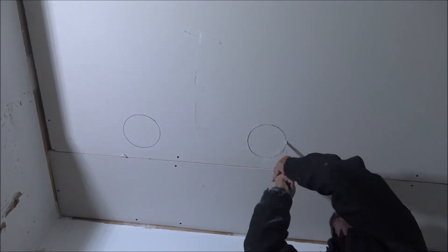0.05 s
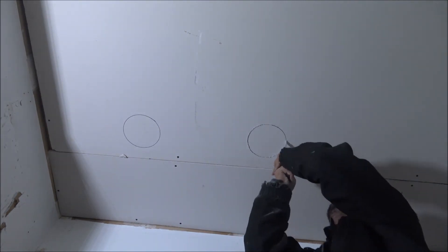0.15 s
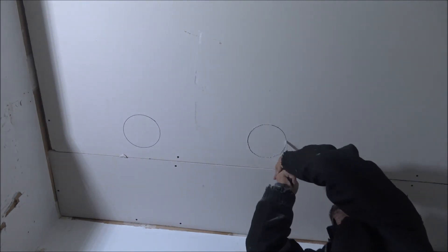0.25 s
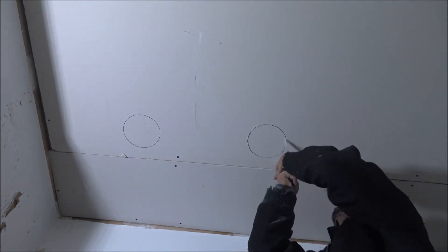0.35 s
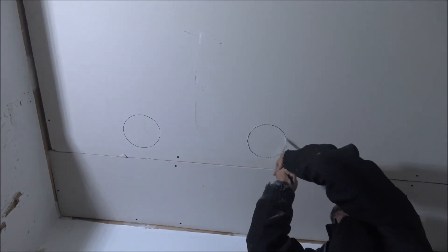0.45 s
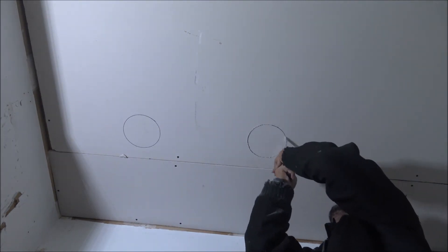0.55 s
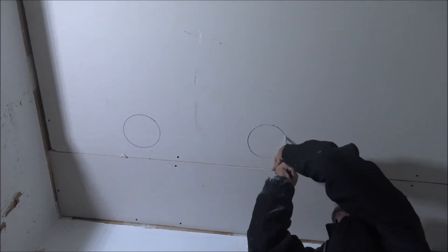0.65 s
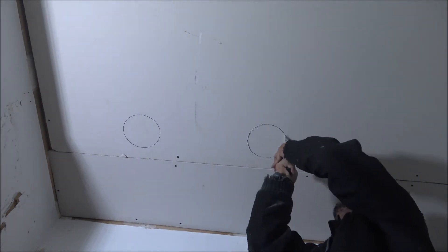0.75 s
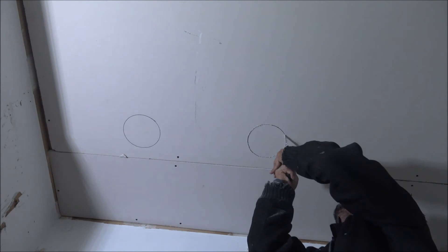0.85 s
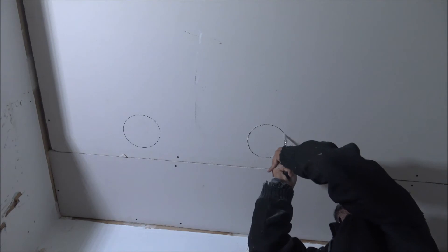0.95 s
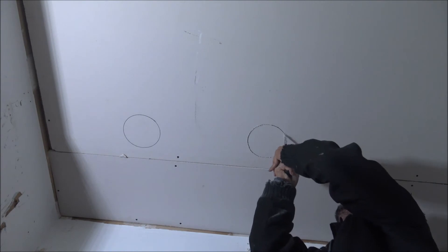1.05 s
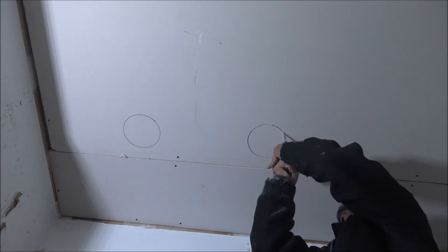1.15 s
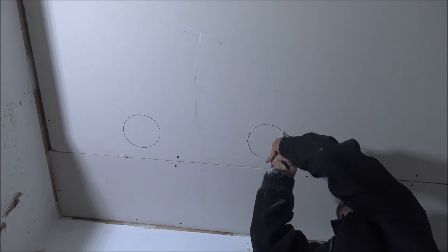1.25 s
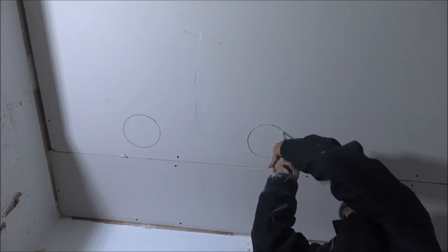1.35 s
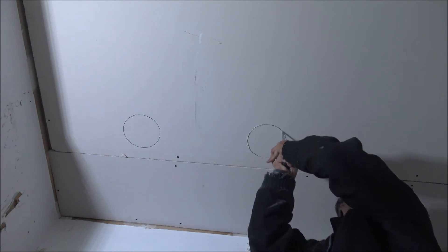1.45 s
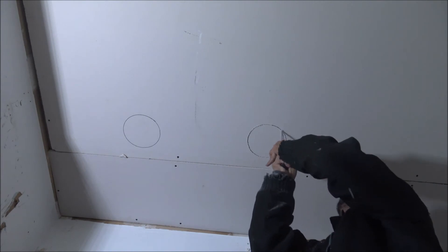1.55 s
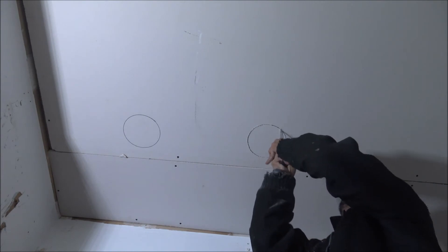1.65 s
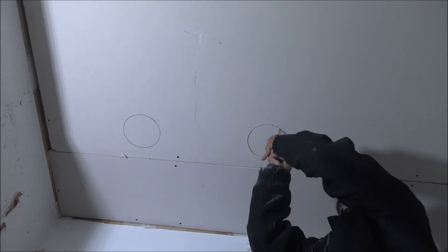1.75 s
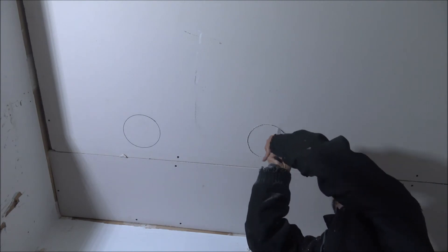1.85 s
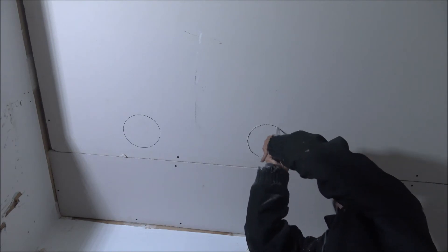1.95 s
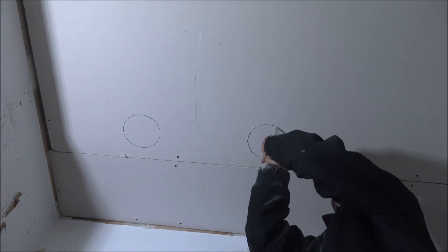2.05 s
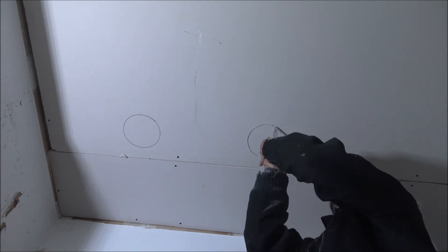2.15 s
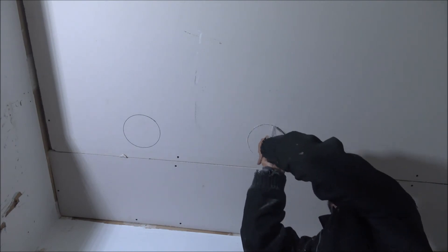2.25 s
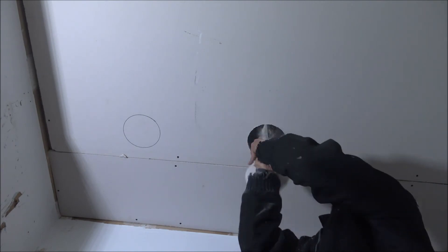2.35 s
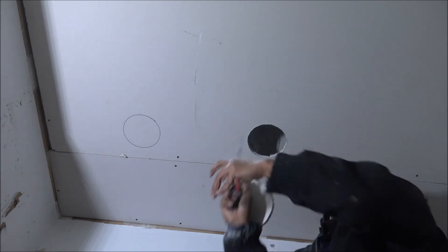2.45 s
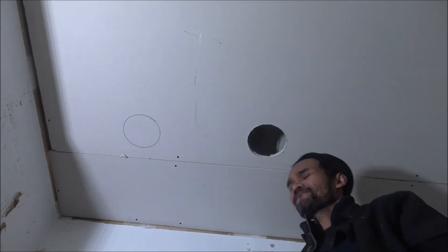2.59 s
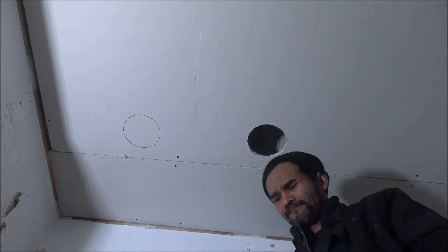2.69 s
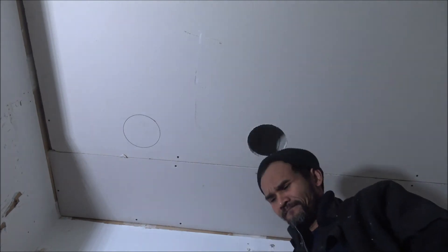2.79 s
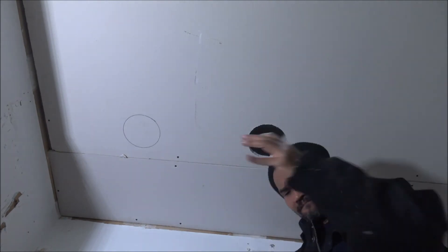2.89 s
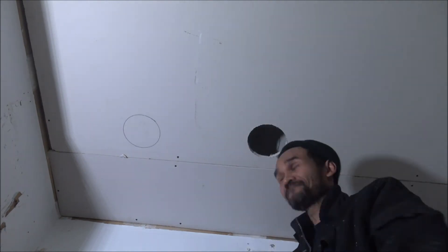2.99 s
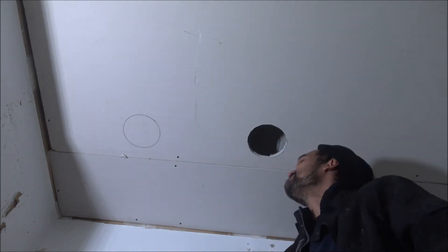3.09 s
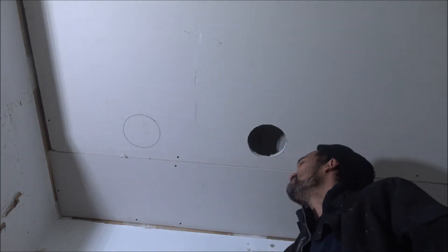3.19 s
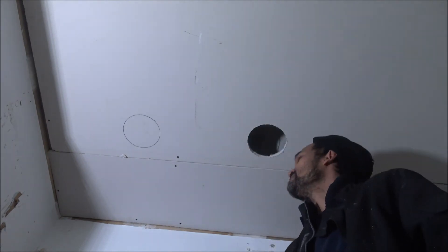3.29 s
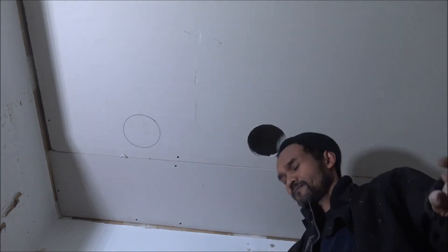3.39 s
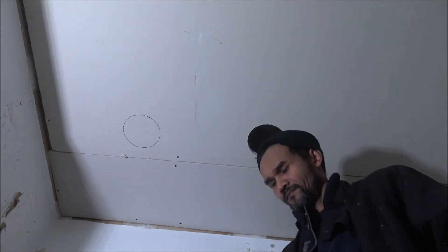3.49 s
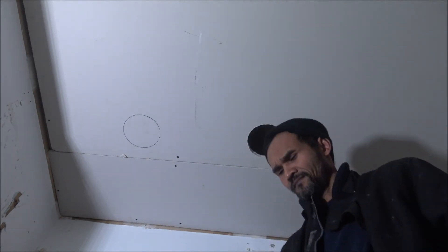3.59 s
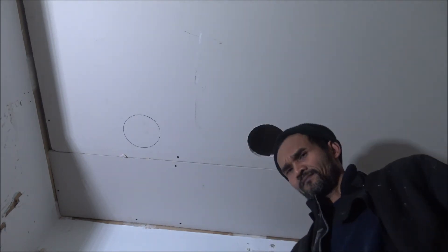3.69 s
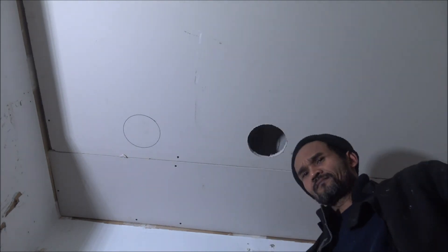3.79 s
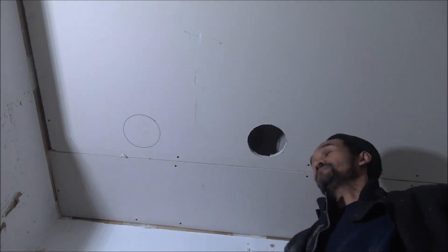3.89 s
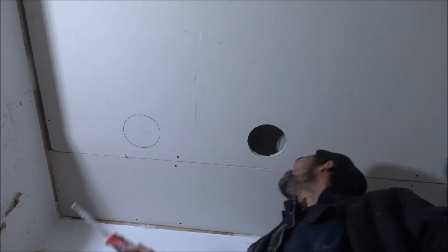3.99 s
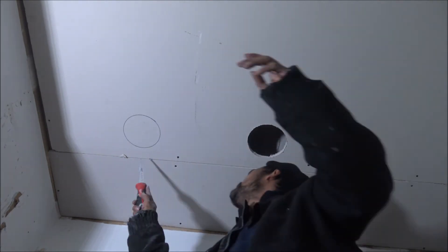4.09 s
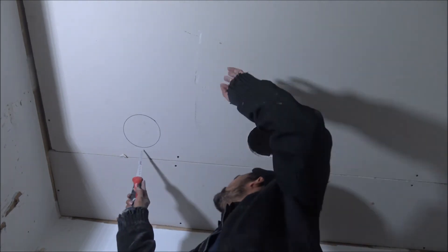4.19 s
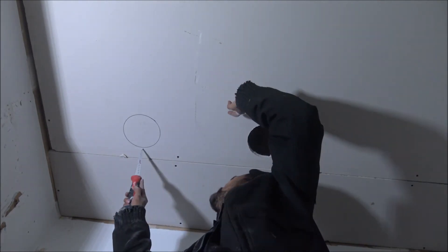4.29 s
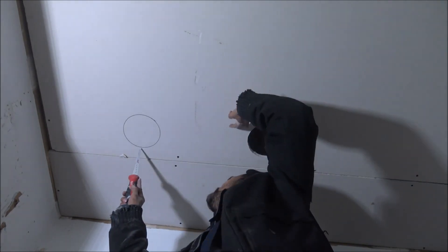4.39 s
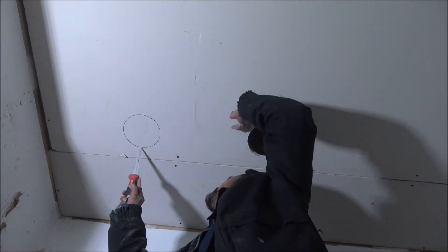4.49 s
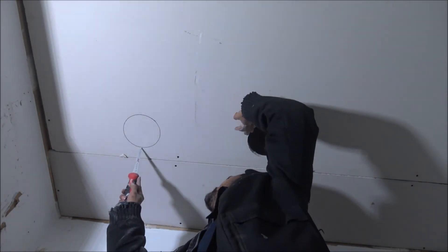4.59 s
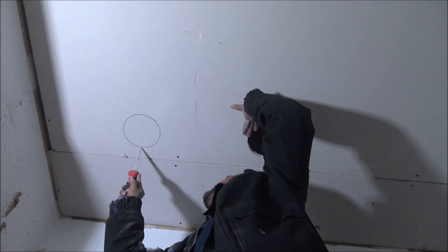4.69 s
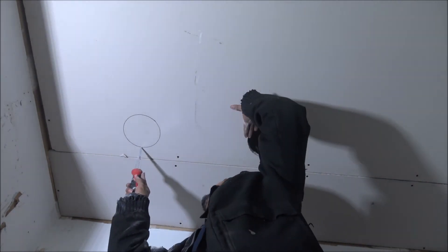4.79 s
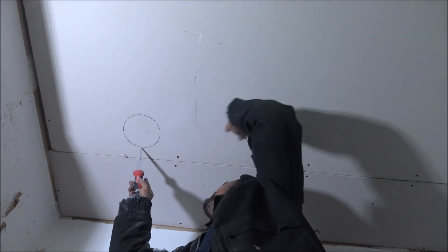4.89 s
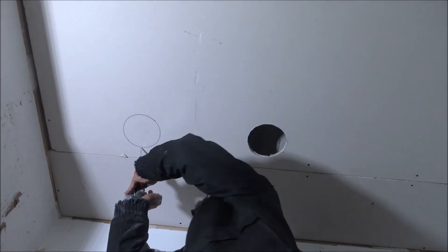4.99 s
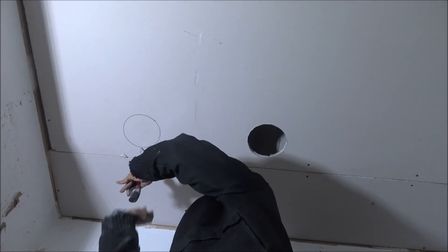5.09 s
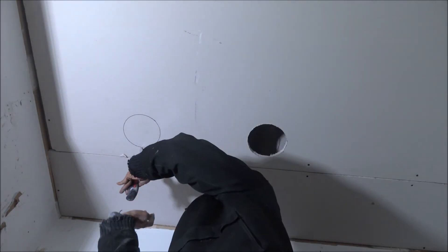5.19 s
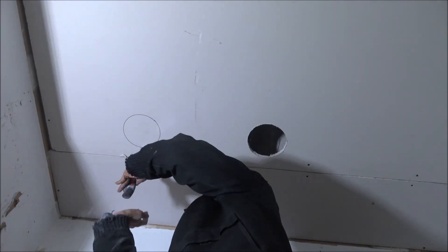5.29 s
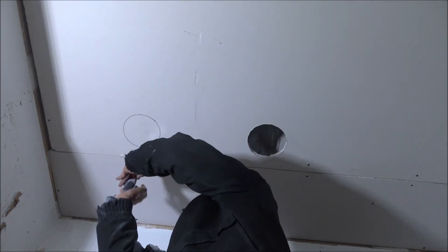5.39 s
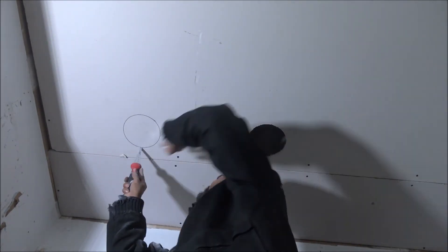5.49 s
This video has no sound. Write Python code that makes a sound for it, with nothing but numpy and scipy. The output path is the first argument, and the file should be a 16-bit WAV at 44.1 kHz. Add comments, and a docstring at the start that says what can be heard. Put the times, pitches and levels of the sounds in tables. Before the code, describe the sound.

Fast back-and-forth sawing makes a hollow sheet buzz and hiss with gypsum dust, pausing twice. The sound stops; metal knocks and scrapes a little left of centre, clothing and hands bump and brush, and small hollow tocks lead to three violent punching crunches. Close microphone, dry small unfinished room, quiet steady air and low electric hum, peaks slightly squashed.

```python
"""Jab saw in a plasterboard ceiling

Very quick strokes cut a round hole: tooth impacts excite the resonant sheet and tear out hissing gypsum.
Steel clatters as the saw comes away, a jacket rustles, the tip pecks and squeaks, then a palm drives the
blade into the next hole with three jabs. Contact forces and fracture noise excite resonant filters.
The room is small and bare, with a faint hum; the image is nearly mono and a limiter rounds off the peaks."""
import sys
import numpy as np
from scipy import signal
from scipy.fft import rfft, irfft, next_fast_len
from scipy.io import wavfile
from scipy.ndimage import uniform_filter1d, minimum_filter1d, map_coordinates

SR = 44100
rng = np.random.default_rng(int(sys.argv[2]) if len(sys.argv) > 2 else 0)


def unload_audio(sound):
    """Save the sound as a 16-bit wav file, at the path given as the first command line argument."""
    columns = np.transpose(np.atleast_2d(sound))
    # keep every value between -1 and 1, then stretch to whole-number steps
    steps = np.round(np.clip(columns, -1, 1) * 32767)
    wavfile.write(sys.argv[1], SR, steps.astype(np.int16))


N = 244314  # length in samples

# Spectrum of a light tap, also of rubbed cloth. Each row: frequency in Hz, relative level in dB.
TAP_SPECTRUM = [(30, -27), (100, -24), (300, -2), (600, 0.5), (900, -2), (1400, -9.5), (2200, -9),
                (4300, -10), (6000, -31.5), (10000, -61)]
# Spectrum of bright surface friction. Each row: frequency in Hz, relative level in dB.
BRUSH_SPECTRUM = [(800, -18.5), (2400, -2), (4000, -1), (6500, -2.5), (11000, -4.5), (16000, -6.5)]
# Spectrum of the room air. Each row: frequency in Hz, relative level in dB.
AIR_SPECTRUM = [(20, -59.5), (40, -38), (62, -25), (82, -20), (105, -15), (160, -13.5), (270, -20.5),
                (470, -13), (650, -20.5), (2500, -27), (3100, -26.5), (4500, -28), (6500, -33),
                (16000, -34)]


def amp(db):
    """Amplitude ratio: 20 dB is a factor of ten."""
    return 10 ** (np.asarray(db) / 20)


def unit(x):
    """Normalization by the root mean square, to rms 1."""
    return x / np.sqrt(np.mean(x ** 2) + 1e-20)


def along(points, hz):
    """Logarithmic frequency scale: (Hz, value) points interpolated at hz."""
    point_hz, values = np.transpose(points)
    return np.interp(np.log(hz + 1), np.log(point_hz + 1), values)


def wobble(rate):
    """Band-limited randomness: a smooth curve through random knots, rate of them a second."""
    knots = rng.standard_normal(int(N * rate / SR) + 4)
    return map_coordinates(knots, [np.arange(N) * rate / SR])


def body(x, spectrum, modes=(), size=16384):
    """Resonance: x drives a minimum-phase filter of unit energy, a broad spectrum plus modal peaks."""
    hz = np.fft.rfftfreq(size, 1 / SR)
    db = along(spectrum, hz)
    for centre, width, rise_db in modes:
        db = db + rise_db / (1 + (2 * (hz - centre) / width) ** 2)
    # folding the cepstrum on to positive times makes the response causal
    cepstrum = irfft(np.log(amp(db)))
    cepstrum[1:size // 2] *= 2
    cepstrum[size // 2 + 1:] = 0
    ring = irfft(np.exp(rfft(cepstrum)))
    return signal.fftconvolve(x, ring / np.linalg.norm(ring))[:N]


def contact(times, lengths, levels_db, rise, t60, sag_db):
    """Contact force: it builds up over rise (s), sags over its length, then decays 60 dB per t60 (s)."""
    force = np.zeros(N)
    for s, length, db in np.broadcast(times, lengths, levels_db):
        start = int(s * SR)
        t = np.arange(min(N - start, SR // 2)) / SR
        held_db = sag_db * (.5 - np.minimum(t / length, 1))
        released_db = -60 * np.maximum(t - length, 0) / t60
        onset = 1 - np.exp(-(t / rise) ** 2)
        force[start:start + len(t)] += amp(db + held_db + released_db) * onset
    return force


def swell(times, lengths, levels_db, early, overrun):
    """Velocity-driven friction: each movement is an arch that peaks a little early and overruns (s)."""
    speed = np.zeros(N + SR)
    for s, length, db in zip(times, lengths, levels_db):
        phase = np.linspace(0, 1, int((length + overrun) * SR))
        arch = np.abs(np.sin(np.pi * phase ** early)) ** 0.78
        speed[int(s * SR):][:len(arch)] += amp(db) * unit(arch)
    return speed[:N]


def crumbs(rate, spread_db, smooth):
    """Fracture noise: random cracks of uneven size, rate a second, over a share of smooth friction."""
    occurs = rng.random(N) < rate / SR
    signs = rng.choice([-1, 1], N)
    cracks = occurs * signs * amp(spread_db * rng.standard_normal(N))
    return unit(unit(cracks) + smooth * rng.standard_normal(N))


def background():
    """Stationary noise and a tone: steady room air and a slightly unsteady electric hum."""
    hum_hz = 101
    phase = 2 * np.pi * hum_hz * np.arange(N) / SR + .25 * wobble(5.5)
    hum = np.sqrt(2) * np.sin(phase)
    air = body(rng.standard_normal(N), AIR_SPECTRUM)
    return amp(-55) * air + amp(-58.5 + 1.9 * wobble(4.02)) * hum


def jacket():
    """Sliding friction: cloth rubs and swishes with arm speed, unevenly as the folds give way."""
    # Arm movements. Each row: start in seconds, length in seconds, level in dB.
    movements = [(0.027, 0.17, -54), (2.395, 0.28, -55), (2.725, 0.33, -57.5), (3.64, 0.18, -52.5),
                 (3.863, 0.37, -51.5), (4.22, 0.4, -64.5), (4.598, 0.5, -54), (5.418, 0.057, -59.5)]
    swish_db = -1.5  # relative to the cloth
    rub = swell(*np.transpose(movements), early=0.84, overrun=0.061) * amp(0.65 * wobble(25))
    cloth = body(rub * crumbs(1500, 3.3, 0.44), TAP_SPECTRUM)
    swish = body(rub * crumbs(900, 9.7, .8), BRUSH_SPECTRUM)
    return cloth + amp(swish_db) * swish


def handling():
    """Soft impact: yielding hands and sleeves bump and brush in the low, middle and high bands."""
    # Bumps. Each row: start in seconds, thud level in dB, tap level in dB, brush level in dB.
    bumps = [(0.103, -59, -53, -45.5), (3.667, -34, -42.5, -42), (3.69, -32, -36.5, -33),
             (3.711, -43, -27, -31), (3.766, -32, -47, -40), (3.865, -31.5, -28, -38.5),
             (3.957, -36, -22, -36), (4.047, -27, -42, -30), (4.056, -23, -29, -24.5),
             (4.094, -36, -52, -32), (4.472, -51, -49, -56), (4.945, -46.5, -40.5, -49),
             (5.037, -44, -44, -52), (5.5, -30.5, -52, -43)]
    # Spectrum of the thud. Each row: frequency in Hz, relative level in dB.
    thud_spectrum = [(25, -38), (70, -20), (120, -2), (165, 7), (200, -12), (260, -23), (400, -15.5),
                     (1200, -40)]
    bump_s = 0.0096
    s, thud_db, tap_db, brush_db = np.transpose(bumps)
    thud = contact(s, bump_s, thud_db, rise=0.0036, t60=0.041, sag_db=1) * crumbs(1500, 0.68, 0.88)
    tap = contact(s, bump_s, tap_db, rise=0.0027, t60=0.051, sag_db=4.5) * crumbs(2500, 3.3, 0.21)
    brush = contact(s, bump_s, brush_db, rise=0.0029, t60=0.047, sag_db=5.5) * crumbs(3400, 1.3, 0.95)
    return body(thud, thud_spectrum) + body(tap, TAP_SPECTRUM) + body(brush, BRUSH_SPECTRUM)


def strokes():
    """Reciprocating motion: runs start with slow, weaker strokes and settle; single strokes join them."""
    # Hesitant strokes before, between and after the runs. Each row: start in seconds, length in seconds,
    # nominal tooth rate in Hz, force in dB, dust in dB.
    single_strokes = [(0.141, 0.012, 993.6, -32.5, -34), (0.164, 0.03, 999.4, -19, -27.5),
                      (0.67, 0.02, 570, -40, -50), (0.701, 0.046, 717, -17.5, -24.5),
                      (0.773, 0.045, 382.3, -15.5, -26.5), (1.342, 0.039, 419.5, -16.5, -25.5),
                      (1.389, 0.032, 472.3, -20.5, -30), (1.442, 0.026, 400.8, -28, -33.5),
                      (2.309, 0.041, 579.1, -15, -23.5), (2.355, 0.068, 597.6, -18.5, -21)]
    # Runs of quick sawing. Each row: start in seconds, end in seconds, settled stroke time in seconds,
    # time lost getting up to speed in seconds, mean tooth rate in Hz, initial force in dB, initial dust in dB.
    runs = [(0.251, 0.672, 0.048, 0.049, 391.1, -12, -19), (0.851, 1.331, 0.042, 0.06, 539.8, -11.5, -20.5),
            (1.494, 2.312, 0.044, 0.025, 561.2, -13, -23)]
    settle_strokes = 2.0  # the arm finds its pace over about this many strokes
    cutting_share = 0.83  # of a stroke's time; in the rest the blade turns round
    slow_loss_db = 12.5  # per unit of speed that a stroke falls short
    stroke_scatter_db, tooth_scatter = 0.5, 0.07  # no two strokes are alike
    # during a run the arm eases off and the kerf clogs
    tire_db_per_s, dust_fade_db_per_s = 6, 9.5
    rows = list(single_strokes)
    for start, end, period, lost, tooth_hz, force_db, dust_db in runs:
        k = np.arange(round((end - start - lost) / period) + 1)
        turns = start + k * period + lost * (1 - np.exp(-k / settle_strokes))
        for s, gap in zip(turns, np.diff(turns)):
            uneven, detune = rng.standard_normal(2)
            effort_db = stroke_scatter_db * uneven - slow_loss_db * (1 - period / gap)
            rows.append((s, cutting_share * gap, tooth_hz * (1 + tooth_scatter * detune),
                         force_db + effort_db - tire_db_per_s * (s - start),
                         dust_db + effort_db - dust_fade_db_per_s * (s - start)))
    return sorted(rows)


def teeth(rate_hz, jitter, scatter_db):
    """Periodic excitation: uneven kicks of the teeth and a rocking of the blade once a tooth, each at rms 1."""
    travel = np.cumsum(rate_hz * np.exp(jitter * wobble(400))) / SR  # in teeth
    catches = np.diff(np.floor(travel), prepend=0)
    kicks = catches * amp(scatter_db * rng.standard_normal(N)) / np.sqrt(rate_hz)
    rocking = np.cos(2 * np.pi * travel) * amp(7.5 * wobble(150))
    return unit(kicks), unit(rocking)


def cut(kicks, rocking, chatter, rasp, dust, boom, dust_spectrum, freed):
    """Forced vibration and fracture: teeth shake the sheet; each catch sets off a spray of gypsum cracks."""
    # Resonances of the ceiling sheet. Each row: centre in Hz, width in Hz, rise in dB.
    sheet_modes = [(215.5, 34, 8), (287, 57, 9.5), (391.5, 42, 10.5), (430, 47, -1), (573, 65, 7),
                   (724.4, 27, 9), (984, 43, 5.5), (1073, 46, 2.5), (1472, 58, 5.5), (1648, 20, 5.5),
                   (1950, 120, 5.5), (2310, 180, 4)]
    # Spectra of chatter in the firm sheet, chatter near a loose disc, gritty rasp and low sheet boom.
    # Each row: frequency in Hz, relative level in dB.
    firm_spectrum = [(30, -39.5), (90, -13), (170, -7), (260, -3), (340, -4.5), (560, -3.5), (800, -7),
                     (1200, -8), (2400, -29), (6000, -51.5)]
    loose_spectrum = [(30, -26), (90, -26.5), (170, -15), (260, -5), (340, -8), (470, 0), (570, -0.5),
                      (800, -1.5), (1200, -12), (2400, -31.5), (6000, -48.5)]
    rasp_spectrum = [(200, -18.5), (550, -4), (850, 2.5), (1400, -2), (1900, -4.5), (2300, -11.5),
                     (2700, -15), (3400, -19.5), (5000, -21.5), (10000, -50)]
    boom_spectrum = [(20, -28), (60, -39.5), (85, -17.5), (110, -16), (130, 1.5), (142, -4.5), (165, -13.5),
                     (260, -22), (600, -88.5)]
    # each catch decays with a time constant of 0.8 ms, over a steady share
    spray = signal.lfilter([1], [1, -np.exp(-1 / (.0008 * SR))], kicks)
    spray = unit(unit(spray) + .25)
    centred_kicks = kicks - uniform_filter1d(kicks, size=300)
    shake = chatter * (.78 * centred_kicks + rocking + .4 * crumbs(1200, 3, .3))
    # a disc that is nearly cut free passes less of the low chatter on to the ceiling
    firm = body(shake * (1 - freed), firm_spectrum, sheet_modes)
    loose = body(shake * freed, loose_spectrum, sheet_modes)
    grit = body(rasp * spray * crumbs(3000, 2.8, 0.57), rasp_spectrum, sheet_modes)
    powder = body(dust * spray * rng.standard_normal(N), dust_spectrum)
    flexing = body(boom * crumbs(900, 3.4, 0.45), boom_spectrum)
    return firm + loose + grit + powder + flexing


def sawing():
    """Speed-dependent excitation: in each stroke tooth rate and hiss follow the blade's speed up and down."""
    # The blade binds in the kerf and flexes the whole sheet. Each row: start in seconds, level in dB.
    binds = [(0.18, -21.5), (0.385, -29.5), (0.57, -30), (0.715, -23), (0.882, -43), (1.065, -23),
             (1.345, -33.5), (1.435, -29), (1.54, -24), (1.65, -24), (2.0, -29), (2.17, -41)]
    # How far the disc being cut has come loose. Each row: time in seconds, share from 0 to 1.
    loosening = [(1.0, 0.01), (1.45, 0.32), (1.95, 1)]
    # Spectrum of the gypsum dust. Each row: frequency in Hz, relative level in dB.
    powder_spectrum = [(800, -43.5), (2500, 4.5), (3500, -5.5), (4700, 0.5), (6200, -7), (8200, -5.5),
                       (10800, -1), (12600, -4.5), (14500, 0.5), (16000, -2.5)]
    rasp_db, boom_db = -1.46, -19  # relative to the force
    bind_length_s = 0.026
    clock = np.arange(N) / SR
    s, length, tooth_hz, force_db, dust_db = np.transpose(strokes())
    moments = s[:, None] + length[:, None] * np.linspace(0, 1, 4)
    speed = tooth_hz[:, None] * [.65, .93, 1.04, .98]
    rate_hz = np.interp(clock, np.sort(moments.ravel()), speed.ravel())
    kicks, rocking = teeth(rate_hz, jitter=.18, scatter_db=4)
    freed = np.clip(np.interp(clock, *np.transpose(loosening)), 0, 1)
    bind_s, bind_db = np.transpose(binds)
    flex = contact(s, length, force_db + boom_db, rise=0.0023, t60=0.14, sag_db=-4)
    flex += contact(bind_s, bind_length_s, bind_db, rise=0.004, t60=0.24, sag_db=2.5)
    chatter = swell(s, length, force_db, early=0.74, overrun=0.004)
    rasp = swell(s, length, force_db + rasp_db, early=0.9, overrun=0.0073)
    dust = swell(s, length, dust_db, early=0.71, overrun=0.0019)
    return cut(kicks, 0.033 * rocking, chatter, rasp, dust, flex, powder_spectrum, freed)


def clatter():
    """Hard impact on a thin plate: steel knocks, scrapes and skids, its blade rings, a bright tick on top."""
    # Contacts and skids. Each row: start in seconds, length in seconds, knock level in dB,
    # scrape level in dB, blade ring level in dB.
    strikes = [(2.554, 0.011, -31, -31.5, -47), (2.618, 0.033, -27, -16.5, -19),
               (2.656, 0.041, -28.5, -18, -28.5), (2.746, 0.035, -25.5, -23, -26.5),
               (2.779, 0.03, -12.5, -18, -31), (2.84, 0.014, -20.5, -40, -35),
               (2.885, 0.0065, -39, -33, -39), (2.968, 0.0096, -14, -17.5, -13),
               (2.994, 0.0079, -18, -44, -51)]
    # Resonances of the blade. Each row: centre in Hz, width in Hz, rise in dB.
    blade_modes = [(2820, 66, -1), (3250, 140, -1), (3415, 240, 6.5), (4210, 120, 6.5), (6340, 250, -5),
                   (6380, 410, 9)]
    # Spectra of knock, scrape, ring and tick. Each row: frequency in Hz, relative level in dB.
    knock_spectrum = [(60, -26), (170, -17), (400, -10), (680, 1.5), (1200, -2), (1900, -1), (2600, -14),
                      (5000, -23), (12000, -39)]
    scrape_spectrum = [(700, -19), (2000, -13), (2800, 3), (3800, -9), (5000, -7), (7000, -32),
                       (12000, -38)]
    ring_spectrum = [(3000, -47), (5500, -9.5), (6400, -6.5), (7000, -2.5), (7800, -21.5), (11000, -42)]
    tick_spectrum = [(2000, -40), (6000, -9), (9500, -0.5), (12000, -2), (15500, -0.5)]
    tick_db = -4.5  # relative to the scrape
    s, length, knock_db, scrape_db, ring_db = np.transpose(strikes)

    def strike(db):
        """Impulsive loading: a brief force roughened by fine contacts."""
        return contact(s, length, db, rise=0.0042, t60=0.02, sag_db=8.5) * crumbs(6000, 2.62, 0.42)

    knock = body(strike(knock_db), knock_spectrum)
    scrape = body(strike(scrape_db), scrape_spectrum, blade_modes)
    ring = body(strike(ring_db), ring_spectrum, blade_modes)
    tick = body(strike(scrape_db + tick_db), tick_spectrum)
    return knock + scrape + ring + tick


def saw_tip():
    """Point excitation: the tip digs into the paper face; the board answers with a small hollow tock."""
    # Pecks and scratches at the next mark. Each row: start in seconds, length in seconds, level in dB.
    pecks = [(4.626, 0.011, -37), (4.671, 0.018, -41), (4.712, 0.0074, -37.5), (4.733, 0.014, -29),
             (4.771, 0.013, -28.5), (4.81, 0.0049, -30), (4.839, 0.0046, -33), (4.886, 0.0088, -35.5),
             (5.521, 0.01, -41)]
    # Resonances of the pecked board. Each row: centre in Hz, width in Hz, rise in dB.
    peck_modes = [(607, 86, 23), (758, 70, 13.5), (1070, 110, -1.5), (1420, 160, 15.5), (2000, 130, -1.5),
                  (2740, 140, 26)]
    # Spectrum of the peck. Each row: frequency in Hz, relative level in dB.
    peck_spectrum = [(30, -30), (80, -6), (280, -6), (600, -5), (900, -4), (1300, -3), (1900, -5),
                     (3000, -28), (8000, -16.5)]
    scratch_db = -5.5  # relative to the peck
    s, length, db = np.transpose(pecks)
    peck = contact(s, length, db, rise=0.0029, t60=0.077, sag_db=2.5) * crumbs(1600, 1.5, 0.47)
    scratch = contact(s, length, db + scratch_db, rise=0.0028, t60=0.041, sag_db=-2)
    scratch *= crumbs(1500, 4.2, 0.61)
    return body(peck, peck_spectrum, peck_modes) + body(scratch, BRUSH_SPECTRUM)


def squeak():
    """Stick-slip: steel catches on gypsum with slightly rising pitch and leaves the blade ringing faintly."""
    # The point twists in the board. One row: start in seconds, length in seconds, nominal pitch in Hz,
    # level in dB.
    twist = (4.889, 0.02, 1232, -35)
    # Resonances of the blade after the twist. Each row: centre in Hz, width in Hz, rise in dB.
    twang_modes = [(6600, 130, 25.5), (9300, 150, 31), (12100, 200, 15)]
    twang_db, twang_t60_s = -51.5, 0.6
    s, length, pitch_hz, db = twist
    glide = np.interp(np.arange(N) / SR, [s, s + length], [.92, 1.05])
    cycles = np.cumsum(pitch_hz * glide * (1 + 0.063 * wobble(400))) / SR
    tone = unit(np.sin(2 * np.pi * cycles))
    twang = contact([s], length, twang_db, rise=0.02, t60=twang_t60_s, sag_db=-6) * rng.standard_normal(N)
    slip = swell([s], [length], [db], early=0.77, overrun=0.0015)
    return slip * tone + body(twang, BRUSH_SPECTRUM, twang_modes)


def jabs():
    """Impulsive tearing: each palm blow rips a few teeth through board and paper, too unevenly to rock."""
    # The blade punched through the board. Each row: start in seconds, length in seconds,
    # chatter level in dB, rasp level in dB, sheet boom level in dB.
    blows = [(5.159, 0.037, -7.5, -15, -17), (5.267, 0.036, -4, -14, -17.5), (5.376, 0.026, -2.5, 0, -25)]
    # Spectrum of the tearing. Each row: frequency in Hz, relative level in dB.
    tear_spectrum = [(800, -7), (2200, 7.5), (3300, 6), (4700, -6.5), (6500, -4), (8500, -8.5),
                     (11000, -5.5), (16000, -7.5)]
    dust_db = -8  # relative to the rasp
    palm_lag_s, palm_s = 0.025, 0.012  # the handle meets the sheet a little later, briefly
    s, length, chatter_db, rasp_db, boom_db = np.transpose(blows)
    kicks, _ = teeth(np.full(N, 760), jitter=.35, scatter_db=3)
    chatter = contact(s, length, chatter_db, rise=0.004, t60=0.024, sag_db=7)
    rasp = contact(s, length, rasp_db, rise=0.0071, t60=0.043, sag_db=4.0)
    dust = contact(s, length, rasp_db + dust_db, rise=0.0052, t60=0.02, sag_db=11.5)
    boom = contact(s + palm_lag_s, palm_s, boom_db, rise=0.0038, t60=0.24, sag_db=6.5)
    return cut(kicks, 0, chatter, rasp, dust, boom, tear_spectrum, freed=0)


def room(x, count=18):
    """Diffuse reverberation: dense wall reflections shift as the body moves; the bass lingers longest."""
    # Reverberation time of the room. Each row: frequency in Hz, time to fall by 60 dB in seconds.
    reverberation = [(100, 0.38), (260, 0.25), (700, 0.12), (2000, 0.11), (5000, 0.11), (13000, 0.11)]
    hz, t, z = signal.stft(rng.standard_normal((count, SR // 2)), SR, nperseg=256)
    t60 = along(reverberation, hz)[:, None]
    fade = amp(-60 * t / t60) / np.sqrt(t60)  # equal energy at all frequencies
    tails = signal.istft(z * fade, SR, nperseg=256)[1]
    tails = signal.sosfilt(signal.butter(1, 350, "high", fs=SR, output="sos"), tails)
    hop = N // (count - 1) + 1
    wet = np.zeros(N + 2 * SR)
    # each tail crossfades into the next at constant power
    for k, tail in enumerate(tails):
        span = np.arange(max(0, (k - 1) * hop), min(N, (k + 1) * hop))
        piece = x[span] * np.cos(np.pi / 2 * (span / hop - k))
        answer = signal.fftconvolve(piece, tail / np.linalg.norm(tail))
        wet[span[0] + int(.002 * SR):][:len(answer)] += answer  # 2 ms after the direct sound
    return wet[:N]


def filtered(x, gain):
    """Linear filtering: the spectrum of x times a gain that depends on frequency."""
    size = next_fast_len(N + SR // 2)
    return irfft(rfft(x, size) * gain(np.fft.rfftfreq(size, 1 / SR)), size)[..., :N]


def scene():
    """Mid-side stereo: work straight ahead, clatter a little to the left, both slightly widened by the room."""
    # Stereo width of the reverberation. Each row: frequency in Hz, side gain in dB.
    width = [(60, -47), (250, -42), (500, -29), (1000, -22.5), (2000, -19), (4000, -15.5), (8000, -35),
             (14000, -26.5)]
    steel = clatter()
    work = sawing() + jabs() + steel + handling() + saw_tip() + squeak() + jacket()
    mid = amp(-1.5) * work + amp(-3.0) * room(work) + background()
    side = filtered(room(work), lambda hz: amp(along(width, hz)))
    side += amp(-22.5) * steel
    side += amp(-69.5) * body(rng.standard_normal(N), AIR_SPECTRUM)
    return np.array([mid + side, mid - side])


def record(dry):
    """Peak limiting and band limiting: a smoothed gain holds down the loudest peaks, then the top is cut."""
    top_hz = 16000
    needed = np.minimum(1, 0.7 / (np.abs(dry).max(axis=0) + 1e-9))
    gain = uniform_filter1d(minimum_filter1d(needed, size=400), size=400)
    return filtered(dry * gain, lambda hz: hz < top_hz)


dry = scene()
out = record(dry)
unload_audio(out)
```